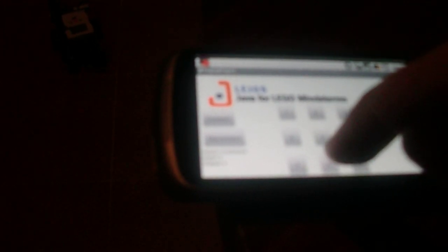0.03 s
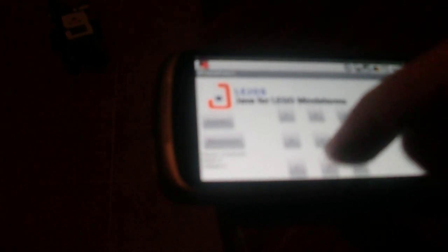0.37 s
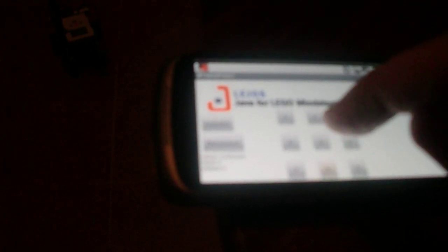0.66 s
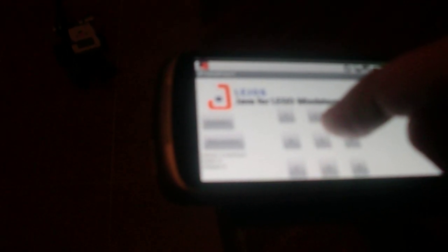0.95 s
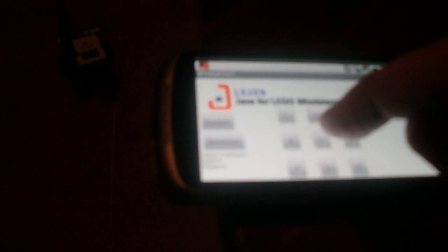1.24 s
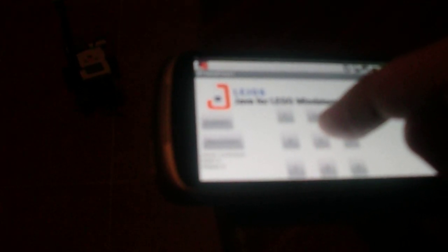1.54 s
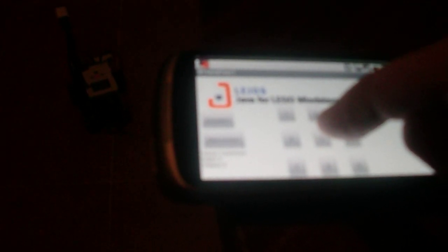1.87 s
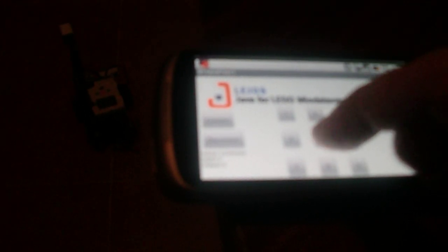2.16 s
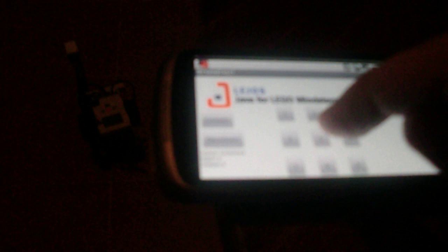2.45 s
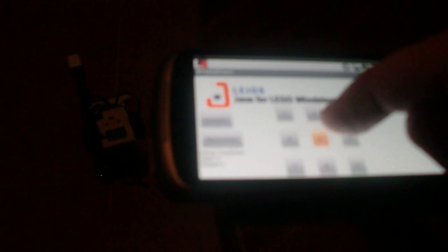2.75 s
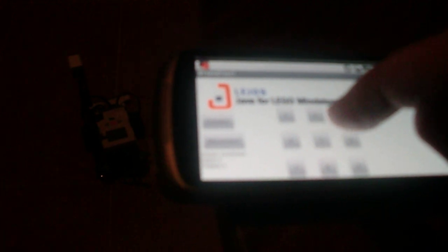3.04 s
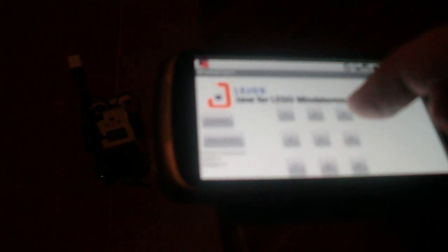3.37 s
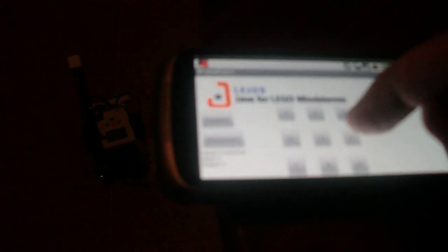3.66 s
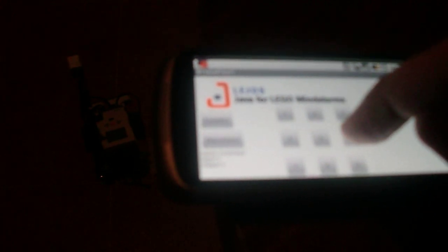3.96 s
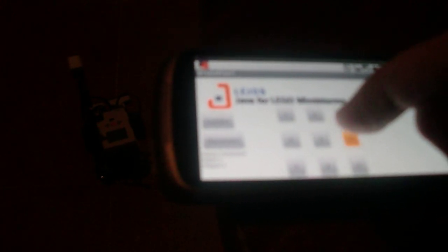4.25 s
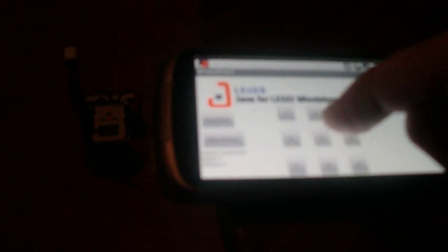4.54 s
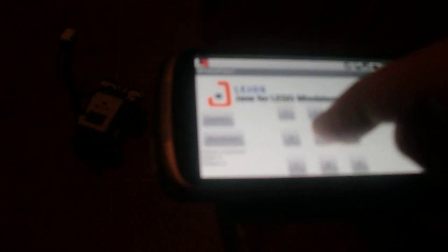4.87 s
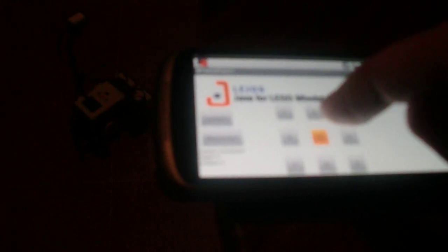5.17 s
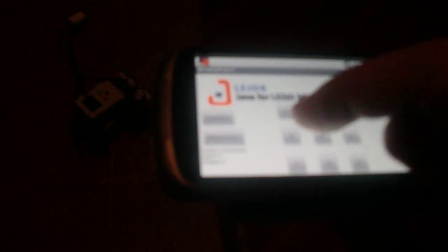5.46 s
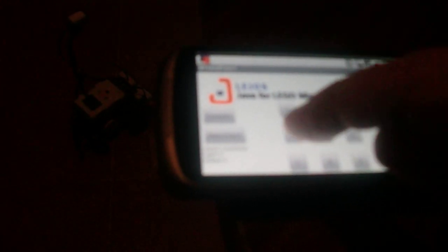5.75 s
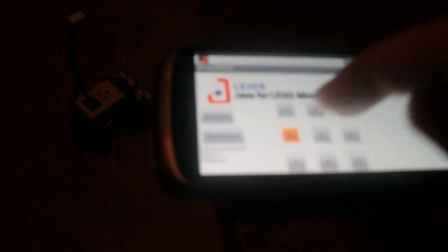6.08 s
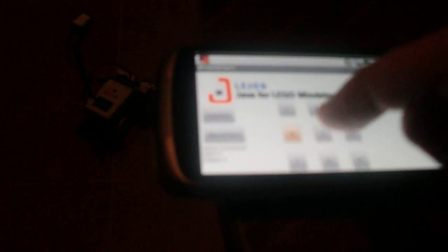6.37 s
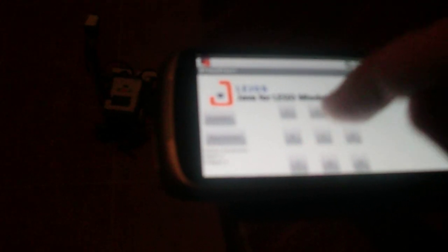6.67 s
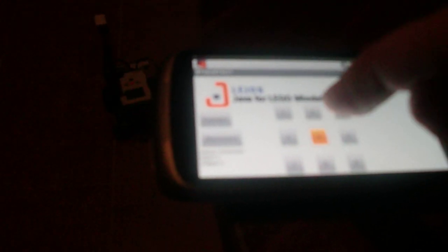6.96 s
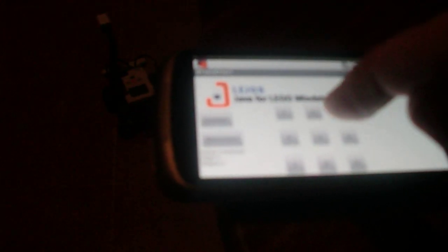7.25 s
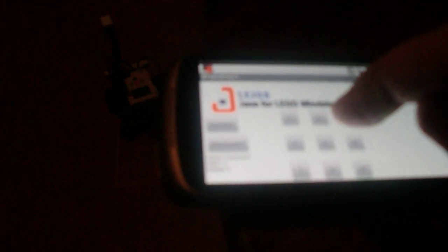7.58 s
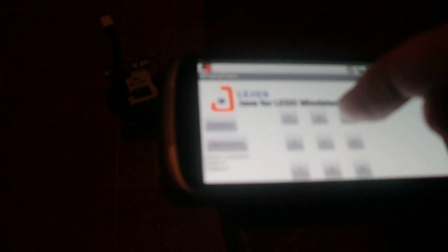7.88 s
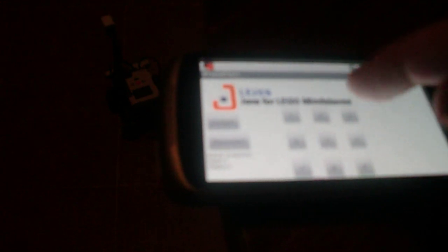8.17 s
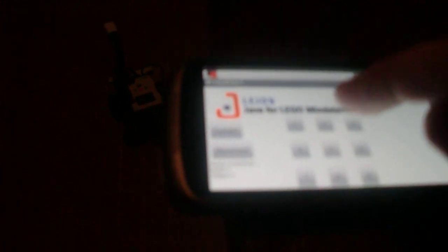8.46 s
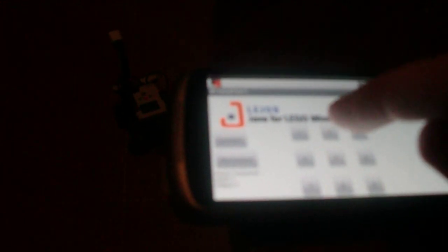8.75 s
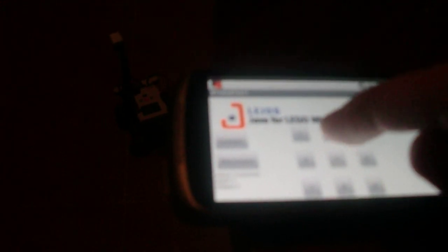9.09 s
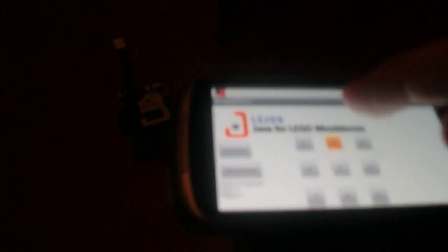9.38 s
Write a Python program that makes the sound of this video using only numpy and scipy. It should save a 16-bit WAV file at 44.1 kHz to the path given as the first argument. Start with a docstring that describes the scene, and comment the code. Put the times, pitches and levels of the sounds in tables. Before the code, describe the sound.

A small wheeled robot moves around a quiet room. Its plastic-geared motors give a very brief whir, pause, then run for about two seconds with a fine, bright clatter and a wavering whine. Two shorter whirs follow as it turns, each under a second. The gears tick lightly as the runs begin, and each stop leaves a short room echo. A nearby microphone adds steady hiss.

```python
"""Geared robot in a quiet room

A small two-wheeled robot makes four runs: a brief nudge, a straight drive and two turns. In each wheel's
motor, impacts of plastic teeth excite the housing (clatter) and periodic meshing gives harmonics (whine).
The gears tick as their slack closes, and the room reverberates after each stop. A nearby camera with one
microphone adds a faint electronic buzz; there is steady hiss and, in the last turn, one soft low bump."""
import sys
import numpy as np
from scipy import signal
from scipy.fft import rfft, irfft, next_fast_len
from scipy.io import wavfile

SR = 44100
rng = np.random.default_rng(int(sys.argv[2]) if len(sys.argv) > 2 else 0)


def wav_out(sig):
    """Save sig, one row per channel (or a flat mono array), as 16-bit PCM at SR to the path in sys.argv[1]."""
    wavfile.write(sys.argv[1], SR, np.round(np.clip(np.atleast_2d(sig).T, -1, 1) * 32767).astype(np.int16))


N = 415422
TIME = np.arange(N) / SR

# Runs: start t/s, stop t/s, spin-up time/s, tooth rate f/Hz, its climb/(Hz/s), level/dB, swell/(dB/s),
# starting surge/dB, treble lift/dB, whine relative to clatter/dB
RUNS = [(-.1, 0.072, .025, 520, 0, -37.5, 0, 2.5, -1.5, -0.5),
        (1.258, 3.244, 0.082, 504, 22, -38.5, 0.89, -2.2, 3.5, -6.5),
        (4.955, 5.776, 0.042, 484, 11, -39, -1.5, 4, 2.8, -.5),
        (6.838, 7.677, .034, 491, -8, -41, -1.5, 6.5, -0.5, 1)]
# Wheel drag slows and softens the gears: t/s, half length/s, slowing/Hz, level drop/dB, treble drop/dB
DRAGS = [(1.489, .12, 9.8, 0.6, 3), (2.16, .085, 39.3, 2.1, -4), (2.345, .026, 26.9, 2.5, -2),
         (2.594, 0.035, 10, 2.5, 4), (2.69, .045, 22, 0, 1), (2.975, .04, 26.8, 1, 2.5),
         (5.16, .05, 35.2, 0, 2), (5.365, .07, 29, 0.8, 1), (5.594, .03, 19.7, 0, 3),
         (7.1, .1, 41.4, 0, 15), (7.425, 0.044, 31, 0, 7)]
# Round trips of a knock through the gearbox wall: t/s
WALL_ROUND_TRIPS = [.00021, .00047, .00083]
# Housing resonances: f/Hz, bandwidth/Hz, lift/dB
HOUSING_MODES = [(1680, 120, 1), (2490, 470, 0.5), (2810, 580, 0.5), (3540, 250, -1.5), (4440, 170, 2),
                 (4100, 200, 0.5), (5970, 130, 0), (8200, 570, 4.5), (9000, 570, -0.5), (9560, 910, 3),
                 (10570, 340, 3), (11800, 470, -1.5), (13100, 480, 0)]
# Response of the housing as heard from the heading of each run: f/Hz, relative level/dB
HOUSING_NUDGE = [(410, -61), (700, -30), (1020, -6), (1300, -15), (1520, -2), (1770, -9), (2050, -2),
                 (2300, -5.5), (4430, -0.5), (7490, -8.5), (8310, -8.5), (16000, -24)]
HOUSING_STRAIGHT = [(410, -58), (700, -14), (1080, -11), (1300, -17.5), (1580, -2.5), (1840, -7.5),
                    (3160, 2.5), (3500, -4), (3940, -0.5), (5610, -7), (6230, -4), (7690, -12), (8210, -11),
                    (10700, -10), (16000, -33)]
HOUSING_FIRST_TURN = [(410, -58), (700, -16), (958, -12), (1330, -16), (1920, -6), (2220, -11.5),
                      (2880, -5.5), (3640, -4.5), (3940, 2.5), (4610, -10.5), (4990, -5), (7110, -9.5),
                      (10500, -14), (13700, -22), (16000, -29)]
HOUSING_SECOND_TURN = [(410, -57), (700, -14), (1230, -17), (1420, -13), (1640, -10.5), (1940, -6.5),
                       (2220, -11), (2840, -2), (3550, -7.5), (4430, -2), (5610, -8.5), (6570, -9.5),
                       (10900, -18.5), (14200, -20.5), (16000, -35.5)]
# Whine of each run: harmonic of the tooth rate, relative level at start/dB, relative level at stop/dB
WHINE_NUDGE = [(3, -6, -4), (4, -5, -1), (5, -4, -3), (6, 2, 1), (9, -2, -2)]
WHINE_STRAIGHT = [(2, -30, -16), (3, -1.5, 0.5), (4, 0, -9), (5, 4, -11), (6, -3, 0), (8, -11, 2.5),
                  (9, -7, -12.5), (12, -5, 4), (18, -10, -7)]
WHINE_FIRST_TURN = [(2, -11, -24), (3, -10, -16.5), (4, -5, -6), (5, -7, -14), (6, 2, -4.5), (7, 1, -4.5),
                    (8, -5, 0), (9, -7, -7), (10, -6, -3), (12, -30, -3), (17, 4, -18), (20, -13, -15)]
WHINE_SECOND_TURN = [(2, -33, -31), (3, -12, -7.5), (4, -5.5, -12.5), (5, -12, -9.5), (6, -2, -1.5),
                     (7, -8, -18), (8, -5, -19), (9, 2, -7), (10, -3, -7.5), (12, -18, -10),
                     (14, -14, -8.5), (17, -18, -10)]
# Reverberation time of the room: f/Hz, T60/s
ROOM_T60 = [(1000, 0.49), (3500, 0.56), (7000, 0.46), (14000, 0.25)]
# Spectral density of the background hiss: f/Hz, relative level/dB
HISS_SPECTRUM = [(12, -30), (20, 3.5), (37, -4.5), (81, -2.5), (138, -2.5), (172, -2.5), (319, -3.5),
                 (399, -4.5), (513, -5.5), (1150, -9), (1760, -10), (2820, -15), (5680, -17.5),
                 (14700, -37), (16000, -32)]
# The gears take up their slack: t/s, peak level before filtering/dB
SLACK_TICKS = [(.172, -43), (1.2546, -44), (1.265, -44), (4.953, -47), (4.9646, -39), (6.832, -33.5),
               (6.844, -36.5)]
# One low bump: t/s, half length/s, f/Hz, level at the crest/dB
LOW_BUMP = (7.135, .03, 103, -60)

SURGE_PEAK_S, SURGE_WIDTH_S = .075, .075   # the gears work hardest while the robot gathers speed
SURGE_TREBLE_DB, SURGE_SAG_HZ = 3, 15   # harder contacts are brighter, and the load holds the motors back
SPIN_UP_DULL_DB, BRAKE_S = 38, 0.011   # slow teeth meet softly; time constant of the fade at a stop
WHINE_HELD_DB, WHINE_SETTLE_S = 17, 0.18   # the whine starts this far down and emerges as the gears settle
WHINE_LOSS = 1.4   # dB of whine lost against the clatter per dB of level lost to drag


def from_db(db):
    """Amplitude ratio of a level: a factor of ten per 20 dB."""
    return 10 ** (np.asarray(db) / 20)


def unit_rms(x):
    """Normalisation to unit mean power."""
    return x / np.sqrt(np.mean(x ** 2) + 1e-20)


def at_hz(table, hz):
    """Interpolation on a logarithmic frequency axis."""
    known_hz, values = np.transpose(table)
    return np.interp(np.log(hz + 1), np.log(known_hz), values)


def drift(rate_hz):
    """Low-passed noise: a random fluctuation of unit spread, mostly slower than rate_hz."""
    hop, warm_up = 40, 2000
    pole = np.exp(-2 * np.pi * rate_hz * hop / SR)
    noise = rng.standard_normal(N // hop + warm_up + 2)
    slow = signal.lfilter([1], [1, -2 * pole, pole * pole], noise)[warm_up:]
    return np.interp(np.arange(N) / hop, np.arange(len(slow)), unit_rms(slow))


def colour(x, spectrum):
    """Filtering as multiplication of the spectrum by a smooth response."""
    size = next_fast_len(N + SR // 10)
    response = from_db(at_hz(spectrum, np.fft.rfftfreq(size, 1 / SR)))
    return irfft(rfft(x, size) * response, size)[:N]


def butter(x, hz, kind, order=2):
    """Butterworth filter: a maximally flat passband."""
    sections = signal.butter(order, np.minimum(hz, .45 * SR), kind, fs=SR, output="sos")
    return signal.sosfilt(sections, x + 1e-18)


def resonance(x, hz, width_hz, lift_db):
    """A resonator added in phase lifts its band; in antiphase it cuts it."""
    return x + (from_db(lift_db) - 1) * signal.lfilter(*signal.iirpeak(hz, hz / width_hz, SR), x)


def drag_response(centre_s, half_length_s, rebound=.22, lag=2.2):
    """Overshoot: the motors make up for a pulse of drag with a smaller rebound, lag half lengths later."""
    age = np.clip((TIME - centre_s) / half_length_s, -6, 9)
    return np.exp(-age ** 2) - rebound * np.exp(-(age - lag) ** 2)


def gear_state(start, stop, spin_up, rate_hz, climb, level_db, swell, surge_db, treble_db, whine_db):
    """Load governs tooth rate, loudness and timbre through the starting surge and the drags."""
    age = np.maximum(TIME - start, 0)
    running = (1 - np.exp(-2 * age / spin_up)) * np.exp(-np.maximum(TIME - stop, 0) / BRAKE_S)
    surge = np.exp(-((age - SURGE_PEAK_S) / SURGE_WIDTH_S) ** 2)
    slowing_hz, softer_db, duller_db = sum(np.outer(losses, drag_response(centre_s, half_length_s))
                                           for centre_s, half_length_s, *losses in DRAGS)
    tooth_hz = rate_hz + climb * age - SURGE_SAG_HZ * surge - slowing_hz
    gain = running * from_db(level_db + swell * age + surge_db * surge - softer_db)
    treble_db = treble_db + SURGE_TREBLE_DB * surge - SPIN_UP_DULL_DB * (1 - running) - duller_db
    whine_db = whine_db - WHINE_HELD_DB * np.exp(-age / WHINE_SETTLE_S) - WHINE_LOSS * softer_db
    return tooth_hz, gain, treble_db, whine_db


def wheel_motor(tooth_hz, wobble, shake, pinion_teeth):
    """Teeth passed and shaft turns are integrals of a speed that friction unsettles."""
    teeth = np.cumsum(tooth_hz * (1 + wobble * drift(5) + shake * drift(90))) / SR
    return teeth, teeth / pinion_teeth


def tooth_clatter(teeth, turns, jitter, uneven_db, shaft_db, rub_db):
    """Impact and friction: one uneven click per tooth plus rubbing flanks, swelling once a shaft turn."""
    contacts = np.flatnonzero(np.diff(np.floor(teeth)) > 0)
    lateness, strength = rng.standard_normal((len(contacts), 2)).T
    delays = np.round(lateness * jitter * N / len(contacts)).astype(int)
    clicks = np.zeros(N)
    clicks[np.clip(contacts + delays, 0, N - 1)] = from_db(uneven_db * np.minimum(strength, 2))
    rub = from_db(rub_db) * rng.standard_normal(N)
    return (unit_rms(clicks) + rub) * from_db(shaft_db * np.cos(2 * np.pi * turns))


def gearbox_wall(x, reflection):
    """Multiple reflection in the plastic, as all-pass loops, draws each knock out over a few ms."""
    for trip_s in WALL_ROUND_TRIPS:
        loop = np.r_[1, np.zeros(round(trip_s * SR)), reflection]
        x = signal.lfilter(loop[::-1], loop, x)
    return x


def housing(knocks, flicker_db, beaming_db):
    """Directivity: each resonance beams its own way, so it swells and fades as the robot moves."""
    knocks = butter(knocks * from_db(flicker_db * drift(15)), 1170, "high", order=3)
    for hz, width_hz, lift_db in HOUSING_MODES:
        knocks = resonance(knocks, hz, width_hz, lift_db + beaming_db * drift(1.6))
    return knocks


def gear_whine(teeth, turns, harmonics, progress, flutter_db=3.0, runout_rad=0.087):
    """Periodic meshing gives harmonics; an off-centre pinion modulates their phase, adding sidebands."""
    phase = 2 * np.pi * teeth + runout_rad * np.sin(2 * np.pi * turns)
    partials, power = 0, 0
    for harmonic, first_db, last_db in harmonics:
        gain = from_db(first_db + (last_db - first_db) * progress)
        flutter = from_db(flutter_db * drift(11.8)[:len(phase)])
        partials += gain * flutter * np.sin(harmonic * phase)
        power += gain ** 2
    return partials / np.sqrt(power)


def robot(mismatch):
    """Superposition of two motors that start and brake together; their unequal speeds make beats."""
    latest_run = np.searchsorted([run[0] for run in RUNS[1:]], TIME)
    tooth_hz, gain, treble_db, whine_db = gear_state(*np.array(RUNS)[latest_run].T)
    motors = [wheel_motor(tooth_hz * (1 + side * mismatch), wobble=.003, shake=.011, pinion_teeth=10)
              for side in (-1, 1)]
    knocks = sum(tooth_clatter(*motor, jitter=.13, uneven_db=3.0, shaft_db=1.5, rub_db=-2.5)
                 for motor in motors)
    radiated = housing(gearbox_wall(knocks, reflection=0.37), flicker_db=1.1, beaming_db=1.2)
    responses = [HOUSING_NUDGE, HOUSING_STRAIGHT, HOUSING_FIRST_TURN, HOUSING_SECOND_TURN]
    whines = [WHINE_NUDGE, WHINE_STRAIGHT, WHINE_FIRST_TURN, WHINE_SECOND_TURN]
    sound = np.zeros(N)
    for (start, stop, *_), response, harmonics in zip(RUNS, responses, whines):
        on = (TIME > start) & (TIME < stop + .5)
        clatter = unit_rms(colour(radiated, response))
        clatter += (from_db(treble_db) - 1) * butter(clatter, 11200, "high", order=1)
        progress = np.minimum((TIME[on] - start) / (stop - start), 1)
        whine = sum(gear_whine(teeth[on], turns[on], harmonics, progress) for teeth, turns in motors)
        sound[on] += gain[on] * (clatter[on] + from_db(whine_db[on]) * unit_rms(whine))
    return sound


def room_response(build_up_s=0.0033):
    """Dense reflections from one spot decay exponentially, soonest in the high treble."""
    t = TIME[:SR * 2 // 3]
    edges_hz = np.geomspace(500, 16000, 6)
    tail = np.zeros(len(t))
    for low, high in zip(edges_hz, edges_hz[1:]):
        decay = from_db(-60 * t / at_hz(ROOM_T60, np.sqrt(low * high)))
        tail += butter(rng.standard_normal(len(t)), [low, high], "band") * decay
    tail *= 1 - np.exp(-t / build_up_s)
    return tail / np.linalg.norm(tail)


def reverberation(x, wet_db, spots):
    """Reflections depend on position: the moving source passes smoothly between several responses."""
    shares = np.array([drift(2.94) for _ in range(spots)])
    shares /= np.linalg.norm(shares, axis=0)
    tail = sum(signal.fftconvolve(x * share, room_response())[:N] for share in shares)
    return (x + from_db(wet_db) * tail) / np.hypot(1, from_db(wet_db))


def background_hiss(level_db):
    """Stationary noise whose spectral density falls towards the treble."""
    return from_db(level_db) * unit_rms(colour(rng.standard_normal(N), HISS_SPECTRUM))


def camera_buzz(pips_per_s, hz, level_db, decay_s=0.0025):
    """Amplitude modulation: the electronics give off narrow-band noise in a train of faint high pips."""
    pip_age = (TIME * pips_per_s % 1) / pips_per_s
    pips = np.exp(-pip_age / decay_s) * rng.standard_normal(N)
    return from_db(level_db) * unit_rms(butter(pips, [hz - 250, hz + 250], "band"))


def slack_ticks(ring_s):
    """Backlash: teeth close their play with short, bright impacts."""
    envelope = sum(from_db(db) * (TIME >= onset) * np.exp(-np.abs(TIME - onset) / ring_s)
                   for onset, db in SLACK_TICKS)
    return butter(envelope * rng.standard_normal(N), [3000, 12500], "band")


def low_bump():
    """Structure-borne sound: a dull swell through the camera body, as of a hand on it."""
    centre_s, half_length_s, hz, level_db = LOW_BUMP
    envelope = from_db(level_db) * np.exp(-((TIME - centre_s) / half_length_s) ** 2)
    return envelope * np.sqrt(2) * np.sin(2 * np.pi * hz * TIME)


def scene():
    """The sources add at one microphone, whose port absorbs a narrow band of the robot's sound."""
    machine = robot(mismatch=.005) + slack_ticks(ring_s=0.0013)
    machine = reverberation(machine, wet_db=-3, spots=8)
    machine = resonance(machine, hz=7730, width_hz=220, lift_db=-26)
    hiss = background_hiss(level_db=-58)
    buzz = camera_buzz(pips_per_s=26, hz=7707, level_db=-83.5)
    buzz += camera_buzz(pips_per_s=24, hz=13500, level_db=-94)
    return np.tile(machine + hiss + buzz + low_bump(), (2, 1))


def record(dry):
    """Band limiting: the camera's steep low-pass filter removes the highest treble."""
    cutoff_hz = 15700
    return signal.sosfilt(signal.ellip(10, .1, 70, cutoff_hz, fs=SR, output="sos"), dry)


dry = scene()
out = record(dry)
wav_out(out)
```